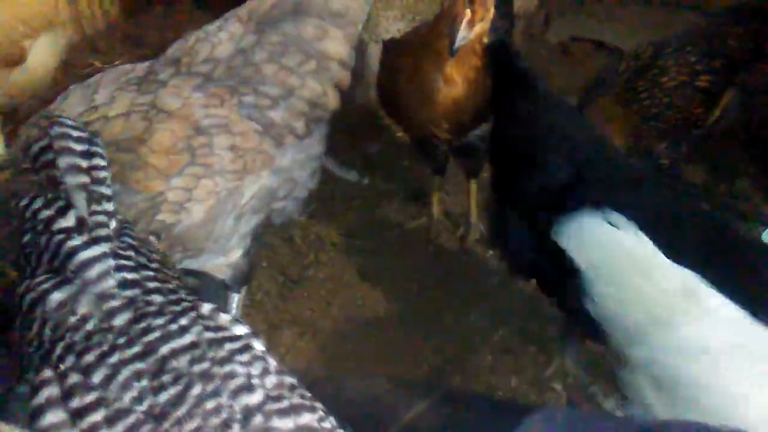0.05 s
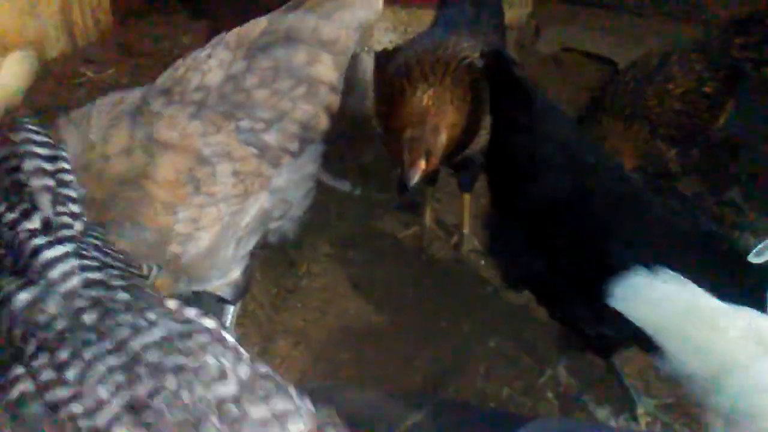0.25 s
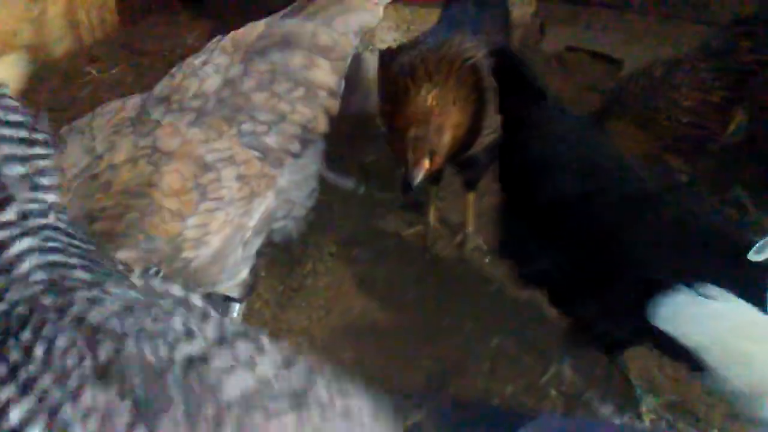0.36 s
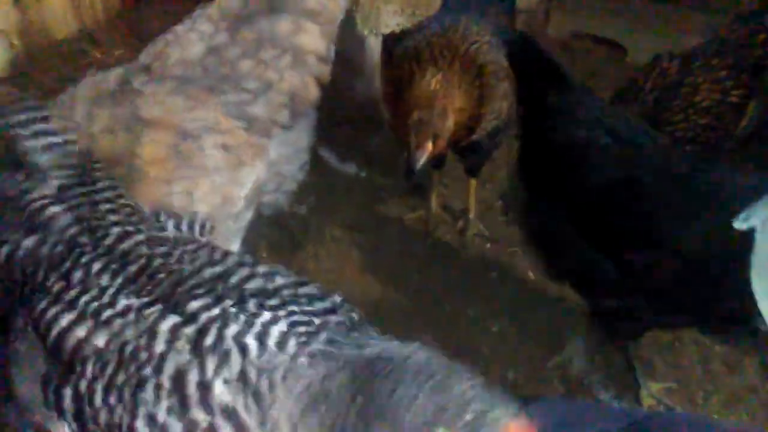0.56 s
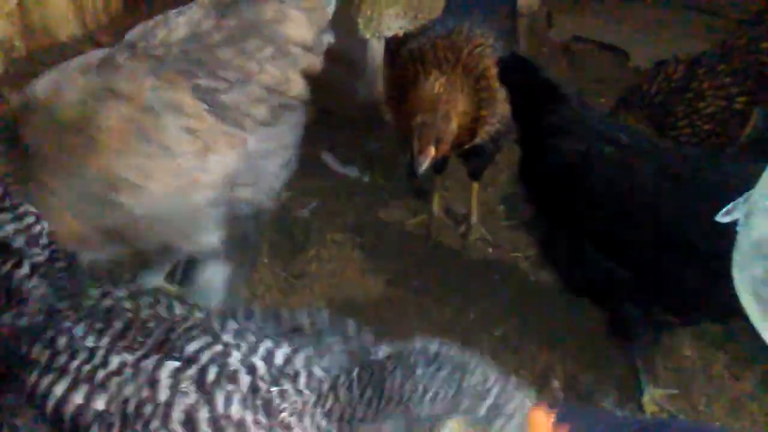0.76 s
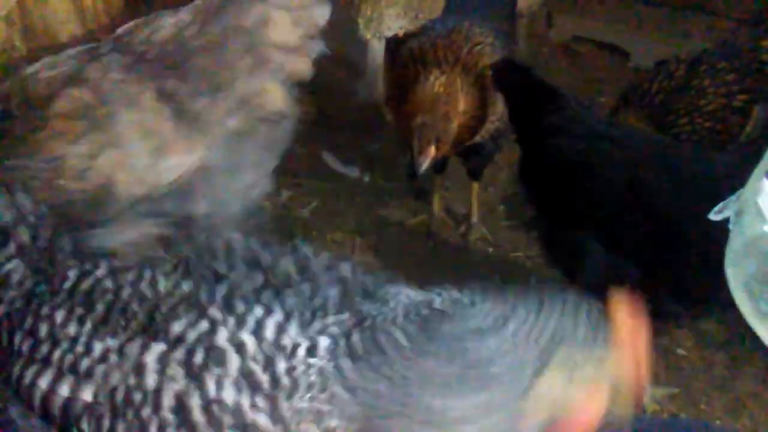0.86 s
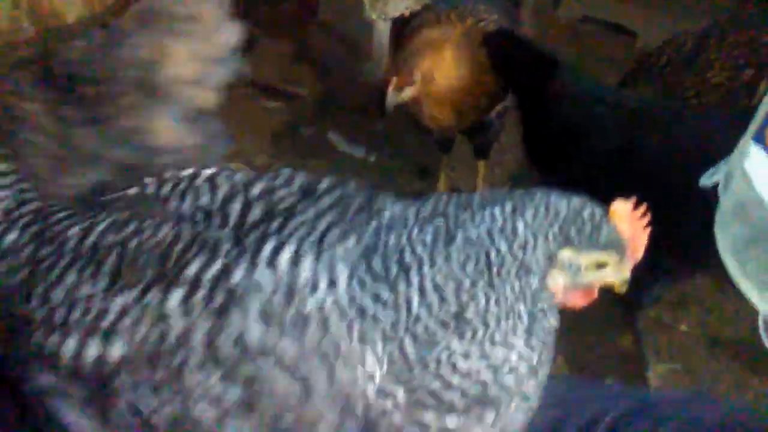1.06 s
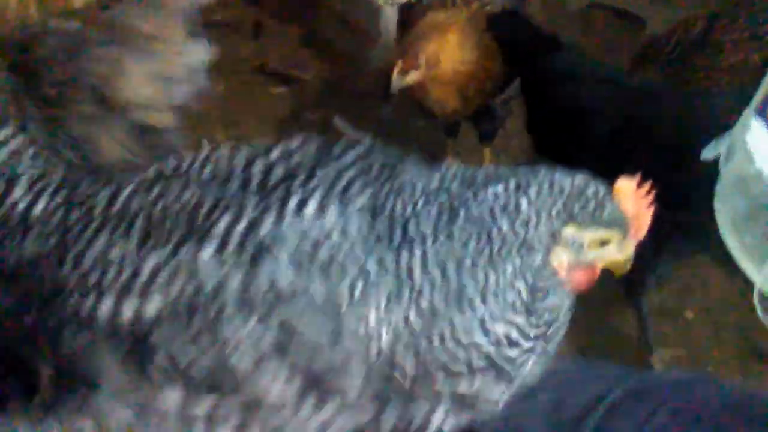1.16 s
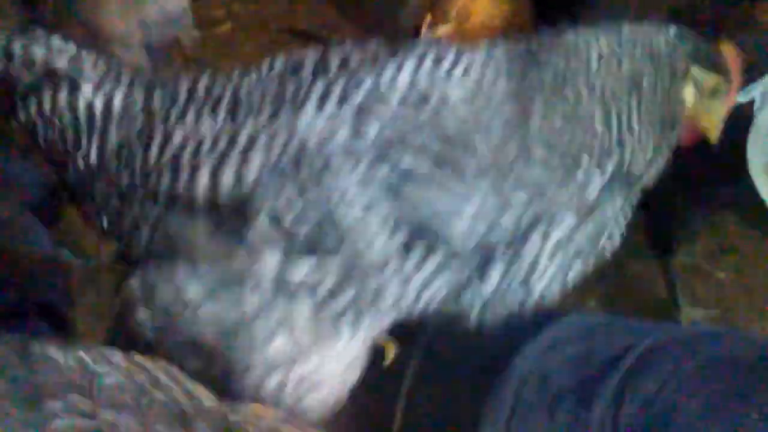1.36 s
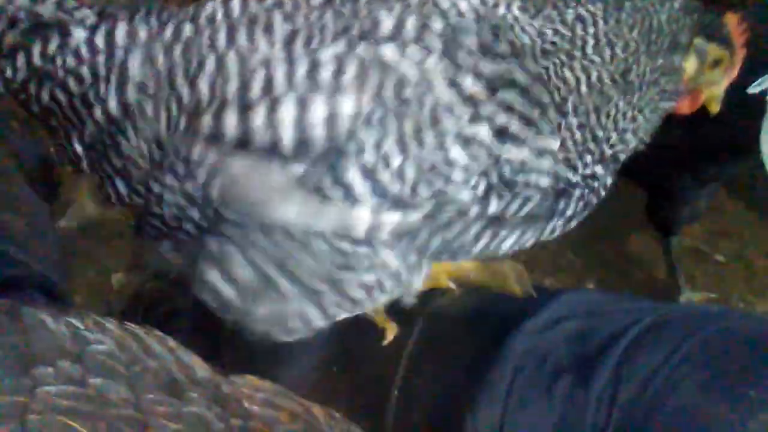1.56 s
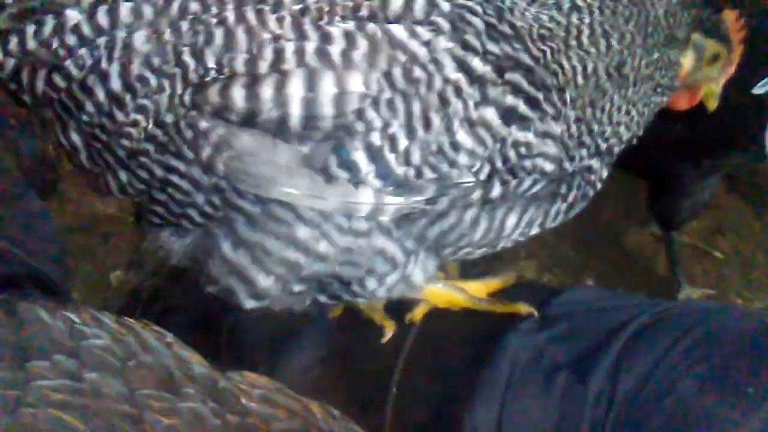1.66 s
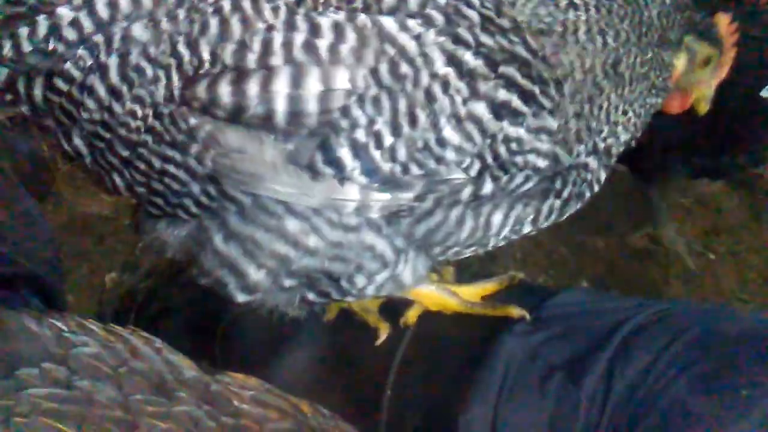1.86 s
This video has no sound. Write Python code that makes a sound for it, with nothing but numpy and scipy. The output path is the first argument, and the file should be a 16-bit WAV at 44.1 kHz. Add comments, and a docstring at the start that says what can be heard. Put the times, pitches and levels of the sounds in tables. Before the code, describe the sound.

Young chickens cluck close by in a small coop, short throaty notes running from 0 to 0.45 s over feather and litter rustle. A sharp peep drops at 0.1 s. A heavy thump lands near 0.48 s as a second falling peep starts. Faint whistles and scratches follow, clucks return at 1 to 1.45 s, and a longer, louder peep slides down from 1.4 to 1.65 s, leaving light rustle. Muffled microphone.

```python
"""Young chickens crowd together in a coop. From the start, short harmonic clucks run over rustling feathers and
litter, and a first two-voiced peep falls through them. Near 0.48 s a heavy thump lands, then a second peep falls.
More clucks follow from 1 s and a third peep from 1.4 s; short whistles, lighter thumps and scratches come throughout.
Clucks are stacked harmonics, peeps two mixing whistles, thumps sine bursts, rustle banded noise. The microphone is
dull above 4 kHz and adds hiss and rumble."""
import sys
import numpy as np
from scipy import signal
from scipy.fft import rfft, irfft
from scipy.io import wavfile
from scipy.ndimage import uniform_filter1d

SR = 44100
rng = np.random.default_rng(int(sys.argv[2]) if len(sys.argv) > 2 else 0)


def wav_out(sig):
    """Save sig, one row per channel (or a flat mono array), as 16-bit PCM at SR to the path in sys.argv[1]."""
    wavfile.write(sys.argv[1], SR, np.round(np.clip(np.atleast_2d(sig).T, -1, 1) * 32767).astype(np.int16))


def rack_gain(trim_db):
    """Turn a fader trim in dB into the linear factor to multiply a signal by."""
    fader = np.asarray(trim_db, float)
    return 10 ** (fader / 20)


N = 83790
T = np.arange(N) / SR  # s

# pitch and loudness along each cluck: t/s, f/Hz, level/dB
CLUCK_LINES = [
    [(0, 347, -29.5), (.012, 362, -29), (.026, 357, -35), (.04, 376, -30)],
    [(.048, 342, -33.5), (.06, 330.2, -30), (.088, 364, -24.5), (.116, 354.4, -32), (.126, 375, -36),
     (.16, 373, -47)],
    [(.206, 471.3, -26), (.222, 459, -14.5), (.238, 424.5, -24.5), (.255, 424, -20), (.268, 429, -25),
     (.29, 433, -26), (.3, 388.5, -31.5), (.325, 394, -38), (.34, 414, -40)],
    [(.394, 470, -16.5), (.399, 430.7, -13.5), (.408, 381.6, -9.5), (.42, 393.7, -12.5), (.431, 367.5, -11),
     (.437, 372.5, -32), (.455, 406, -34), (.472, 413, -31)],
    [(.984, 365.3, -31), (.99, 355, -31), (1.003, 380.6, -33), (1.012, 355.5, -40), (1.035, 366.4, -38),
     (1.05, 355, -46)],
    [(1.11, 400, -50), (1.125, 354, -27), (1.14, 355, -20.5), (1.172, 343.6, -25), (1.182, 319.4, -37),
     (1.2, 347, -36.5), (1.21, 356, -48), (1.22, 337, -45), (1.255, 319, -47.5)],
    [(1.305, 340, -59), (1.312, 351, -28), (1.322, 355, -65), (1.34, 364, -30)],
    [(1.382, 434, -32), (1.392, 378.7, -23.5), (1.405, 389.3, -24), (1.42, 341.6, -29), (1.438, 368, -37.5),
     (1.455, 375, -60)],
]
# throat of each cluck: resonance f/Hz, boost/dB, second resonance f/Hz, boost/dB, tilt/(dB per octave),
# treble boost/dB, roughness 0-1, breath level/dB relative to the harmonics
CLUCK_THROATS = [(780, 20.5, 1600, 14, -8.5, 15, 0.37, -24), (720, 11, 1430, 15, -7.5, -3, 0.11, -32),
                 (880, 5, 1440, 12, -12.5, 30, 0.58, -16), (820, 15.5, 2720, 8.5, -11.5, 37.5, 0.14, -26),
                 (1160, 14, 1540, 13.5, -9.5, 15, 0.32, -8), (700, 4, 2600, 9, -11.5, 38, 0.04, -16),
                 (960, 25, 1050, -17, -17, 17, 0.51, -33), (776, 2, 1500, 5, -15, 31.5, .06, -42)]
# air noise in the clucks: f/Hz, relative level/dB per Hz
BREATH_COLOUR = [(200, -33), (350, -3.5), (700, -6.5), (1300, -1.5), (2500, -11), (4000, -20),
                 (8000, -11.5), (16000, -24.5)]
# lower voice of each peep, from one half of the voice box: t/s, f/Hz, amplitude level/dB
PEEP_LOW = [
    [(.096, 4050, -55), (.104, 3700, -41), (.12, 3270, -43), (.152, 2940, -32.5), (.164, 2900, -19),
     (.178, 2660, -18), (.19, 2529, -20.5), (.196, 2252, -13.5), (.202, 1904, -11), (.207, 1234, -16),
     (.224, 1140, -19), (.236, 1100, -55)],
    [(.53, 4050, -53), (.55, 3900, -36.5), (.565, 3500, -43), (.58, 3210, -36), (.61, 2840, -34),
     (.64, 2610, -25), (.651, 2540, -29.5), (.656, 2250, -25.5), (.661, 1924, -20.5), (.667, 1500, -11.5),
     (.673, 1150, -23.5), (.685, 1070, -32)],
    [(1.38, 3260, -50), (1.405, 3700, -45.5), (1.418, 3900, -29.5), (1.44, 3630, -30), (1.447, 3700, -31),
     (1.46, 3420, -31), (1.5, 2970, -25), (1.54, 2755, -23.5), (1.58, 2685, -19.5), (1.604, 2645, -15),
     (1.614, 2630, -33.5), (1.66, 2550, -59)],
]
# upper voice of each peep, from the other half: t/s, f/Hz, amplitude level/dB
PEEP_HIGH = [
    [(.092, 4730, -62), (.104, 4644, -21), (.114, 4380, -49), (.128, 4100, -33), (.14, 3906, -24.5),
     (.152, 3710, -22), (.16, 3110, -42), (.166, 2930, -40)],
    [(.486, 6740, -24), (.5, 6600, -23), (.535, 5690, -49), (.565, 4810, -24.5), (.595, 4350, -22.5),
     (.61, 3930, -34), (.625, 3390, -41), (.631, 2840, -31), (.636, 2800, -57)],
    [(1.41, 5706, -26), (1.42, 5272, -34), (1.45, 4865, -25.5), (1.48, 4395, -30), (1.515, 4250, -26.5),
     (1.522, 4170, -18), (1.54, 4174, -17), (1.568, 3980, -26), (1.573, 3854, -18), (1.585, 3780, -22.5),
     (1.6, 3510, -36), (1.611, 3267, -20.5), (1.617, 3130, -13.5), (1.622, 2915, -21), (1.626, 2717, -16.5),
     (1.632, 2520, -15), (1.638, 2480, -45)],
]
# rasp around the two whistles, one a peep: level/dB
PEEP_RASP = (-6.5, -12.5, -25)
# overtones, sum and difference tones: multiple of lower pitch, multiple of upper pitch
MIX_TONES = [(2, 0), (3, 0), (4, 0), (0, 2), (0, 3), (1, 1), (-1, 1), (2, 1), (1, 2), (-1, 2)]
# base strength of those tones, one row a peep, one column a tone: level/dB
MIX_LEVELS = [(-3, -22, -34, -2, -32, -12, -30, -16, -22, -28), (2, -8, -12, 0, -32, -2, -30, 0, -18, -30),
              (-14, -20, -12, -2, -20, -1, -14, -6, -10, -8)]
# voice quality along each peep: t/s, lift of lower overtones/dB, lift of upper overtones/dB, undertone level/dB
PEEP_QUALITY = [
    [(.095, -20, 10, -50), (.15, -12, 2, -50), (.165, -2, -6, -13), (.185, -8, -10, -11),
     (.193, -30, -10, -14), (.205, -30, -10, -18), (.21, 6, -10, -18), (.23, 2, -10, -22)],
    [(.49, -20, -14, -50), (.545, -20, -6, -50), (.565, -16, 9, -50), (.6, -8, 3, -40), (.63, -2, 0, -14),
     (.65, 0, 0, -11), (.655, -35, 0, -22), (.69, -30, 0, -22)],
    [(1.41, -22, 13, -50), (1.45, -16, 11, -50), (1.505, -8, 9, -50), (1.525, -4, -8, -40),
     (1.56, 2, -4, -50), (1.59, 2, -4, -40), (1.63, -10, -10, -30)],
]
# rough undertones: quarters of the lower pitch
UNDERTONE_QUARTERS = (1, 2, 3, 5)
# flutter of the upper voice in each peep: from t/s, to t/s, rate f/Hz, level of each sideband/dB
PEEP_FLUTTER = [(0.152, .165, 350, -12), (0.61, 0.642, 329.6, -19.5), (1.51, 1.603, 308.5, -13)]
# short whistled notes, some of them far peeps, and one steep fall at the start of the third peep:
# t/s, length/s, from f/Hz, to f/Hz, amplitude level/dB
WHISTLE_NOTES = [(0.347, 0.026, 1850, 2460, -47.5), (0.491, 0.021, 1750, 2160, -50),
                 (0.793, 0.081, 3580, 3290, -50), (.80, 0.049, 3150, 3070, -50.5),
                 (0.843, 0.06, 3300, 2630, -48.5), (.88, 0.053, 2530, 2330, -48),
                 (1.008, 0.017, 3350, 3500, -49), (1.049, 0.013, 1700, 1100, -35),
                 (1.08, 0.064, 2540, 2396, -43.5), (1.114, 0.033, 462.8, 536, -27),
                 (1.343, 0.017, 1812, 1680, -31), (1.344, 0.0089, 3400, 3640, -53),
                 (1.418, 0.02, 6900, 5000, -20), (1.481, 0.058, 1250, 1053, -38.5),
                 (1.493, 0.062, 1650, 1606, -46.5), (1.65, 0.068, 2828, 2790, -44),
                 (1.695, 0.044, 2310, 2430, -40)]
# blows of feet and bodies: centre t/s, f/Hz, amplitude level/dB, cycles from the centre to -54 dB
THUMP_BLOWS = [(.474, 700, -16.5, 3.8), (.48, 354, -1.5, 1.86), (0.48, 94, -14.5, 1.2),
               (.493, 330, -18.5, 2.1), (.508, 330, -20.5, 1.6), (0.727, 294, -17, 1.32),
               (.866, 740, -37.5, 3.8), (0.881, 324, -32.5, 1.64), (0.954, 322, -33.5, 5.7),
               (1.01, 620, -16.5, 3.1), (1.025, 1780, -30, 15), (1.495, 244, -28.5, 1.9),
               (1.666, 296, -38.5, 3.6), (1.802, 486, -35, 3.5)]
# scratches in the litter: onset t/s, relative level/dB, time to fall 60 dB/s, relative treble weight
LITTER_SCRATCHES = [(.05, -41, 0.057, -5), (.055, -46.5, 0.01, 19), (0.163, -41.5, 0.26, 10),
                    (0.452, -25.5, 0.24, 0), (.475, -23.5, .015, 16), (.652, -24.5, 0.142, -12),
                    (.664, -52, .015, 6), (.724, -37, 0.057, 4), (0.941, -40, 0.07, 5),
                    (0.997, -37, 0.23, 5), (1.29, -52, 0.04, -21), (1.36, -56, 0.023, 20.5),
                    (1.385, -46, 0.14, 15), (1.445, -65, 0.021, 12), (1.686, -47.5, 0.12, 22),
                    (1.723, -51, 0.12, 15), (1.799, -38.5, 0.037, 10.5)]
# rustle of the flock: t/s, relative level/dB, treble lift/(dB per octave)
FLOCK_RUSTLE = [(0, -34.5, -4), (.045, -53.5, 4.5), (.14, -46, 13), (.26, -39, 7.5), (.34, -42, 0.5),
                (.39, -45.5, 5.5), (.5, -41.5, 1.5), (.6, -38, 10), (.7, -44.5, 7.5), (.78, -50, 10),
                (.93, -50.5, 4.5), (1.04, -44.5, 3.5), (1.1, -42.5, 1.5), (1.17, -41, 1.5),
                (1.24, -48.5, 5.5), (1.265, -65.5, 15), (1.29, -44.5, 1), (1.5, -44, 7), (1.65, -51, 13),
                (1.78, -51, 11.5), (1.9, -46, 6.5)]
# colour of rustle and scratches: f/Hz, relative level/dB per Hz
RUSTLE_COLOUR = [(100, -6.5), (250, -8), (400, -5), (700, -12.5), (1300, -10), (2500, -22.5), (4000, -33.5),
                 (8000, -13), (16000, -34)]
# microphone response: f/Hz, level/dB
MIC_RESPONSE = [(90, -79), (125, -24), (170, -6), (300, -3), (3900, -1.5), (4250, -11), (4600, -40),
                (5000, -35), (5600, -31.5), (6600, -28), (8000, -29.5), (10200, -25.5), (11800, -26.5),
                (13000, -33), (16000, -49)]
# microphone hiss and rumble: f/Hz, relative level/dB per Hz
HISS_COLOUR = [(20, -35), (30, -18), (42, 3.5), (60, 10), (78, 6), (95, 0), (118, -20), (1000, -33),
               (10000, -24.5), (16000, -12.5)]


def col(rows, k):
    """Column k joined by straight lines in time."""
    return np.interp(T, [r[0] for r in rows], [r[k] for r in rows])


def gate(t0, t1, edge):
    """Opens from t0 and is shut again at t1, with soft edges."""
    return np.sin(np.pi / 2 * np.clip(np.minimum(T - t0, t1 - T) / edge, 0, 1)) ** 2


def colour(x, points, count=2048):
    """Causal minimum-phase filter with the response given as f/Hz, level/dB."""
    f = np.maximum(np.arange(count + 1) * SR / 2 / count, 1)
    level_db = np.interp(np.log(f), np.log([p[0] for p in points]), [p[1] for p in points])
    cepstrum = irfft(np.log(rack_gain(level_db)))
    # folding the cepstrum forward in time makes the filter causal
    cepstrum[1:count] *= 2
    cepstrum[count + 1:] = 0
    impulse = irfft(np.exp(rfft(cepstrum)))[:count]
    return signal.fftconvolve(x, impulse)[:N]


def unit(x):
    """Rms 1."""
    return x / np.sqrt(np.mean(x ** 2))


def walk(rate):
    """Smooth random drift, renewed about rate times a second, rms 1."""
    k = max(int(SR / rate), 1)
    return unit(uniform_filter1d(uniform_filter1d(rng.standard_normal(N), k), k))


def turns(hz):
    """Phase in radians of a moving pitch."""
    return 2 * np.pi * np.cumsum(hz) / SR


def bump(hz, centre_hz, width_oct):
    """Bell-shaped resonance on an octave scale, peak 1."""
    return np.exp(-.5 * (np.log2(hz / centre_hz) / width_oct) ** 2)


def clucks():
    """Harmonic stacks through the throat; rough calls waver in pitch and strength, and breath pulses at the pitch."""
    throat_width_oct, treble_hz, treble_width_oct = 0.23, 7780, 0.25
    blur_rad = .09  # phase scatter that grows with each overtone
    out = 0
    for rows, throat in zip(CLUCK_LINES, CLUCK_THROATS):
        res_hz, boost_db, res2_hz, boost2_db, tilt_db, treble_db, rough, breath_db = throat
        hz = col(rows, 1)
        phase = turns(hz * (1 + 0.045 * rough * walk(170)))
        blur, swell_db = walk(200), 6 * rough * walk(90)
        stack, power = 0, 0
        for k in range(1, 28):
            gain_db = tilt_db * np.log2(k)
            gain_db = gain_db + boost_db * bump(k * hz, res_hz, throat_width_oct)
            gain_db = gain_db + boost2_db * bump(k * hz, res2_hz, throat_width_oct)
            gain_db = gain_db + treble_db * bump(k * hz, treble_hz, treble_width_oct)
            gain = rack_gain(gain_db)
            # rolling the drifts gives each harmonic its own wavering
            swell = rack_gain(np.roll(swell_db, 997 * k))
            scatter = blur_rad * max(k - 2, 0) * np.roll(blur, 1499 * k)
            stack = stack + gain * swell * np.cos(k * phase + k * k + scatter)
            power = power + gain ** 2 / 2
        breath = unit(colour(rng.standard_normal(N), BREATH_COLOUR)) * (1 + np.cos(phase))
        voice = stack / np.sqrt(power) + rack_gain(breath_db) * breath
        out = out + voice * rack_gain(col(rows, 2)) * gate(rows[0][0] - .003, rows[-1][0], 0.0054)
    return out


def peep_voice(rows):
    """Phase and amplitude of one half of the voice box, both slightly unsteady."""
    phase = turns(col(rows, 1) * (1 + 0.00361 * walk(202)))
    size = rack_gain(col(rows, 2) + .8 * walk(150)) * gate(rows[0][0], rows[-1][0], .003)
    return phase, size


def peeps():
    """Two whistles in one throat, with rasp, overtones, sum and difference tones and rough undertones."""
    out = 0
    for low, high, rasp_db, mix_db, quality, flutter_row in zip(
            PEEP_LOW, PEEP_HIGH, PEEP_RASP, MIX_LEVELS, PEEP_QUALITY, PEEP_FLUTTER):
        low_phase, low_size = peep_voice(low)
        high_phase, high_size = peep_voice(high)
        t0, t1, rate_hz, depth_db = flutter_row
        depth = 2 * rack_gain(depth_db + 3.5 * walk(99)) * gate(t0, t1, 0.0085)
        flutter = 1 + depth * np.sin(turns(rate_hz * (1 + 0.0638 * walk(51.6))))
        pair = low_size * np.sin(low_phase) + flutter * high_size * np.sin(high_phase)
        out = out + pair * (1 + rack_gain(rasp_db) * walk(1400))
        for (m, n), db in zip(MIX_TONES, mix_db):
            order = abs(m) + n
            size = (low_size ** abs(m) * high_size ** n) ** (1 / order)
            lift_db = (abs(m) * col(quality, 1) + n * col(quality, 2)) / order
            tone = np.sin(m * low_phase + n * high_phase + .2 * walk(300))
            out = out + rack_gain(db + lift_db + 5 * walk(45)) * size * tone
        for k in UNDERTONE_QUARTERS:
            undertone = np.sin(k * low_phase / 4 + .9 * walk(250))
            out = out + rack_gain(col(quality, 3) + 4.5 * walk(150)) * low_size * undertone
    return out


def whistles():
    """Short gliding sine notes that waver in pitch and level."""
    out = 0
    for t, dur, hz0, hz1, db in WHISTLE_NOTES:
        hz = np.interp(T, [t, t + dur], [hz0, hz1]) * (1 + 0.01625 * walk(300))
        level = rack_gain(db + 3.2 * walk(200)) * gate(t, t + dur, 0.19 * dur)
        out = out + level * np.sin(turns(hz))
    return out


def thumps():
    """Soft blows: sine bursts that swell and fade in a bell shape."""
    out = 0
    for t, hz, db, cycles in THUMP_BLOWS:
        bell = np.exp(-(np.clip((T - t) * hz / cycles, -9, 9) * 2.5) ** 2)
        out = out + rack_gain(db) * bell * np.sin(2 * np.pi * hz * (T - t))
    return out


def rustle():
    """Feathers and litter: half-octave noise bands that flicker alone and together, with gritty scratches on top."""
    out, shared = 0, walk(37)
    grit = rack_gain(1.86 * rng.exponential(size=N // 32 + 1) - 2.5).repeat(32)[:N]  # steps of 32 samples
    for hz in 130 * 2 ** np.arange(0, 7, .5):
        edges_hz = [hz / 2 ** .25, hz * 2 ** .25]
        band_filter = signal.butter(2, edges_hz, "band", fs=SR, output="sos")
        band = signal.sosfilt(band_filter, rng.standard_normal(N))
        treble_oct = np.clip(np.log2(hz / 1470), 0, 1.5)
        crispness = bump(hz, 7400, .6)  # how much of a scratch's treble weight this band takes
        level_db = col(FLOCK_RUSTLE, 1) + treble_oct * col(FLOCK_RUSTLE, 2)
        env = rack_gain(level_db + 1.74 * shared + 3.0 * walk(45))
        for t, db, t60, treble in LITTER_SCRATCHES:
            fall_db = 60 * np.maximum(T - t, 0) / t60
            onset = np.clip((T - t) / 0.0027, 0, 1)
            env = env + grit * rack_gain(db + 1.82 * crispness * treble - fall_db) * onset
        out = out + band * env
    return 11 * colour(out, RUSTLE_COLOUR)


def coop_echo(near):
    """Short echo of the coop: a decaying noise tail that starts after 3 ms."""
    t60_s, echo_db = 0.11, -11.5
    t = T[:SR // 4]
    tail = rng.standard_normal(len(t)) * rack_gain(-60 * t / t60_s) * (t > .003)
    return rack_gain(echo_db) * signal.fftconvolve(near, tail / np.linalg.norm(tail))[:N]


def scene():
    """Voices and thumps with the coop's echo, over the dry rustle."""
    near = clucks() + peeps() + whistles() + thumps()
    return (near + coop_echo(near) + rustle())[None]


def band_limit(x):
    """A steep low-pass at the top of the band."""
    return signal.sosfilt(signal.butter(12, 15730, fs=SR, output="sos"), x)


def record(dry):
    """Microphone colour, its own hiss and rumble, and a steep cut of the top."""
    hiss = rack_gain(-63) * unit(colour(rng.standard_normal(N), HISS_COLOUR))
    top_cut = signal.ellip(8, .2, 70, 15550, fs=SR, output="sos")  # low-pass, Hz
    mix = signal.sosfilt(top_cut, colour(dry[0], MIC_RESPONSE) + hiss)[None]
    return band_limit(mix)


dry = scene()
out = record(dry)
wav_out(out)
```